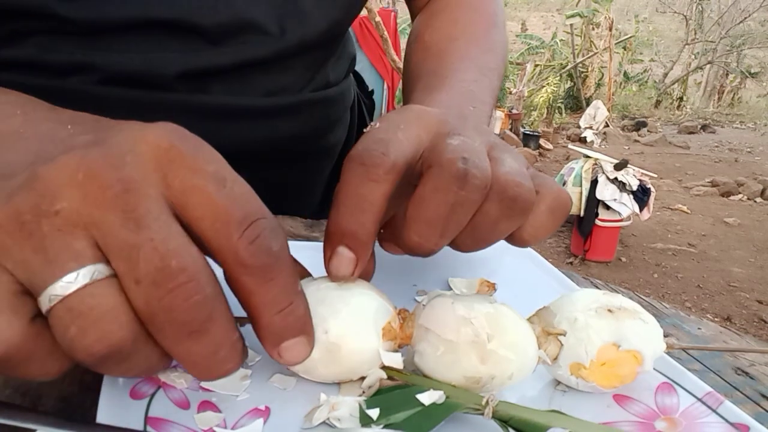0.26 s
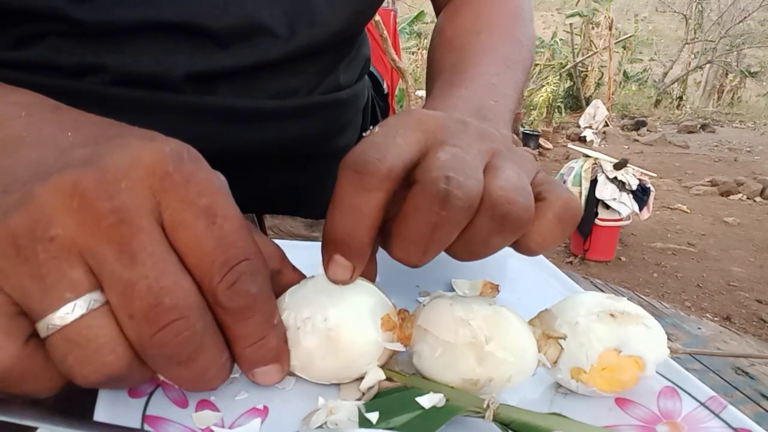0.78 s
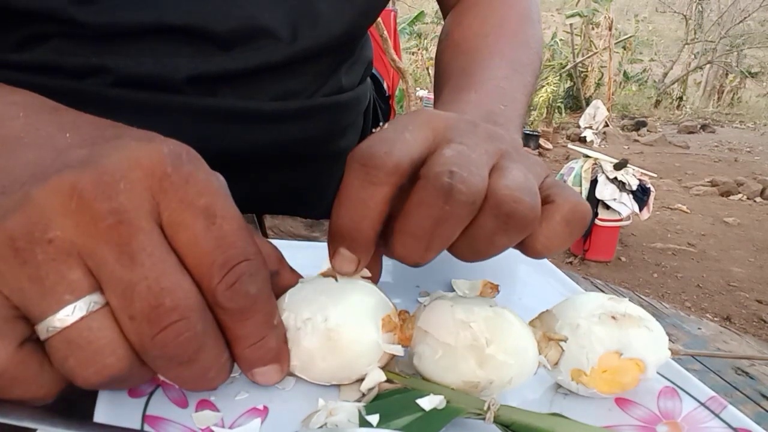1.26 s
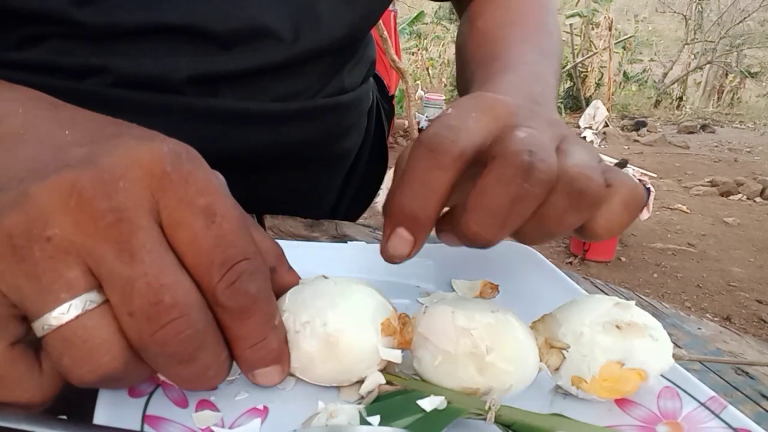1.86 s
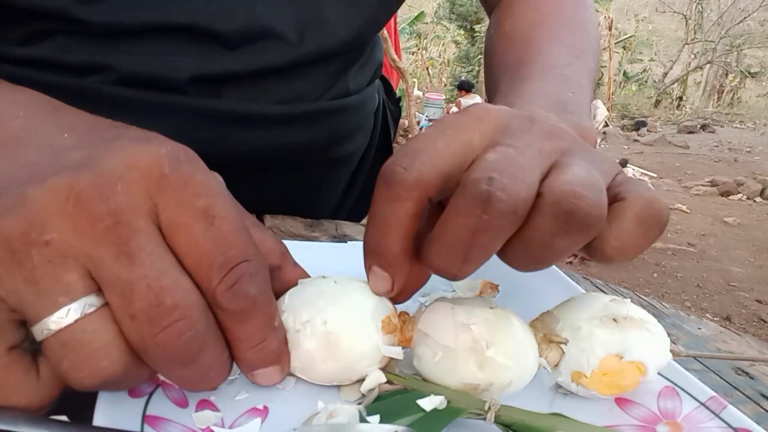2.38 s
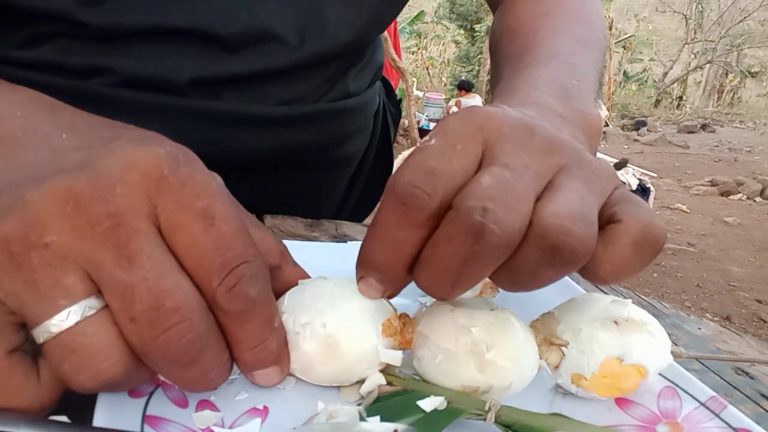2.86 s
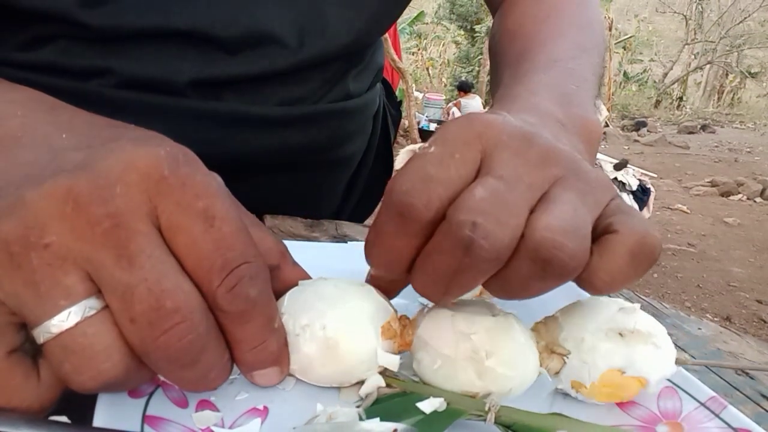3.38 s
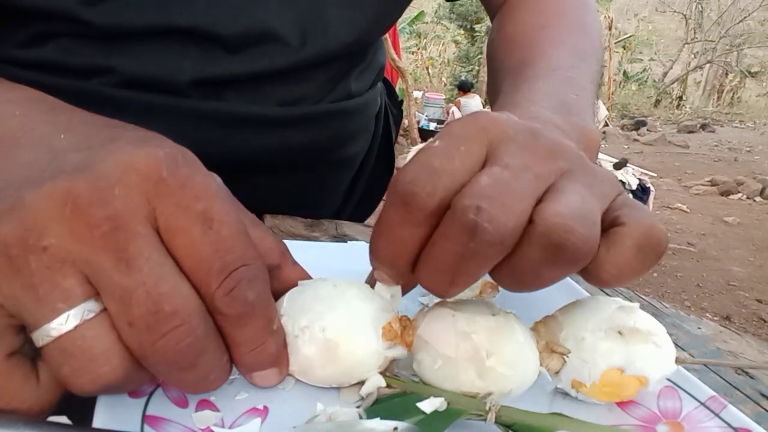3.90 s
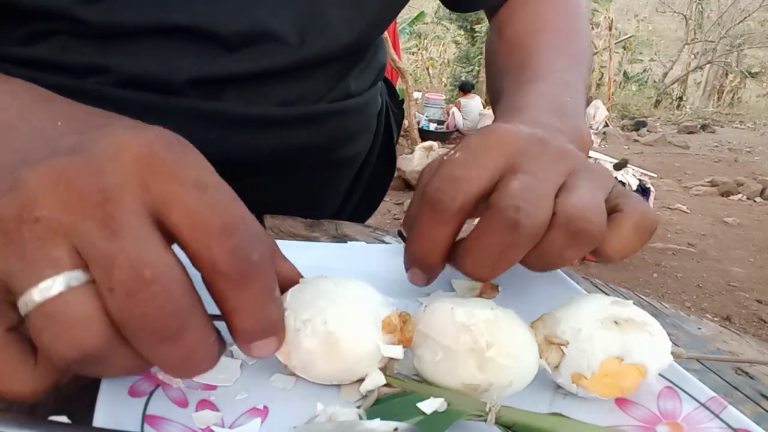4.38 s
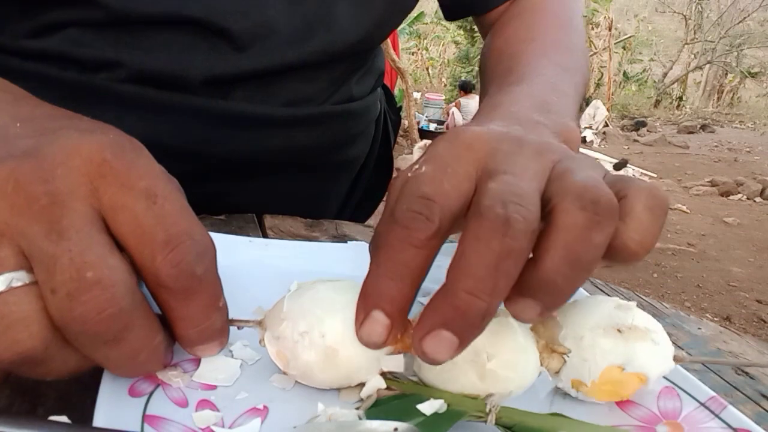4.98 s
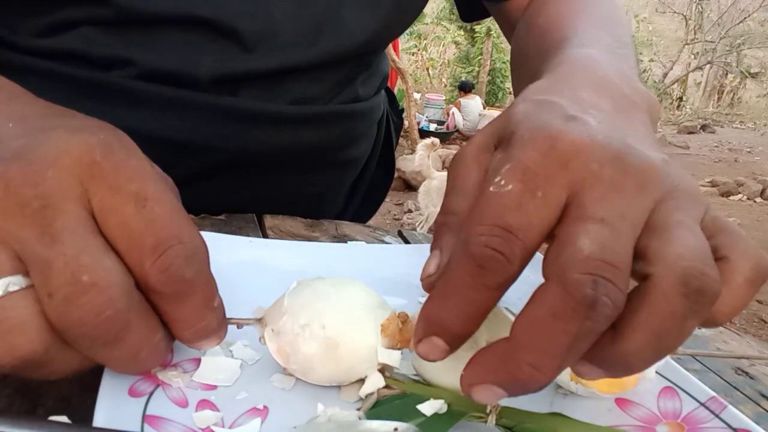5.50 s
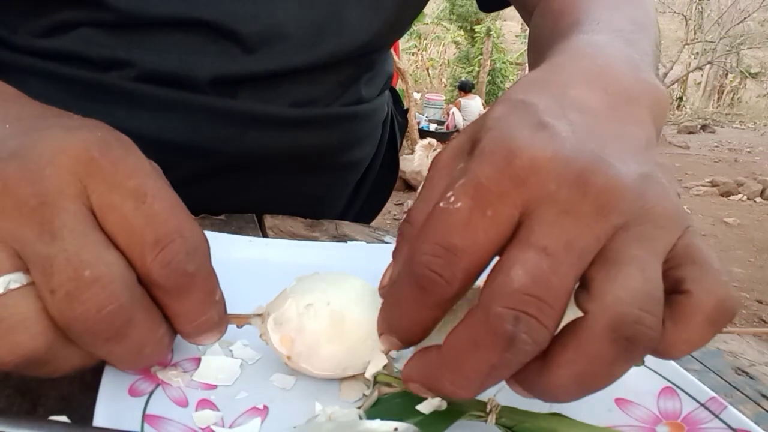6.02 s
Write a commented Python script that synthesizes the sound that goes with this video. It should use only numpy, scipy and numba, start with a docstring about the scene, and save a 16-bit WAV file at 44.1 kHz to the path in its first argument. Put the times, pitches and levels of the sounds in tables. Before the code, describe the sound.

Close-miked eggshell peeling: light ticks, crackling membrane and a few hard snaps. A faint distant crow trails off first; a second later a near rooster crows loudly, hoarse and torn, with clear sung notes between rasps, ending in a falling moan. Then mostly picking sounds, short tray scrapes and pauses, over a low hush of open air and small wind thumps.

```python
"""Rooster and boiled eggs in a dirt yard

A distant rooster trails off as two wavering partials, then one crows close by: sung notes are stacks of
partials, the rasp is chaotic puffs and breath ringing the windpipe. At the microphone fingers pick shell
off boiled eggs on a plastic tray: noise-burst snaps, clicks as crackle, two drags ringing the tray modes.
A light wind buffets the microphone over the hush of the yard, both of them coloured noise."""
import sys
import numpy as np
from scipy import signal
from scipy.fft import rfft, irfft
from scipy.io import wavfile
from scipy.ndimage import uniform_filter1d
from numba import njit

SR = 44100
rng = np.random.default_rng(int(sys.argv[2]) if len(sys.argv) > 2 else 0)


def log_audio(samples):
    """Write samples as a 16-bit WAV file to the path given in sys.argv[1]."""
    # one column per channel
    frames = np.atleast_2d(samples).T
    # limit to full scale, then quantise
    limited = np.clip(frames, -1, 1)
    pcm = np.round(limited * 32767).astype(np.int16)
    wavfile.write(sys.argv[1], SR, pcm)


N = 275625
TIME = np.arange(N) / SR

# The near rooster's neck sinks and the windpipe lengthens. Each row: time in seconds, share sunk from 0 to 1.
SINK = [(1.35, 0), (2.05, 0), (2.2, .35), (2.36, .88), (2.6, 1)]


def from_db(db):
    """Decibels to gain."""
    return 10 ** (np.asarray(db) / 20)


def rms_one(x):
    """Scale to rms 1."""
    return x / np.sqrt(np.mean(x ** 2) + 1e-20)


def evened(x):
    """Hold the slow level at 1."""
    return x / np.sqrt(uniform_filter1d(x ** 2, size=6000) + 1e-20)


def in_time(rows):
    """Columns of a curve table, read at every sample."""
    s, *columns = np.transpose(rows)
    return [np.interp(TIME, s, c) for c in columns]


def at_hz(points, hz):
    """Read a spectrum on a log-frequency axis."""
    points = np.array(points)
    return np.interp(np.log(hz), np.log(points[:, 0]), points[:, 1])


def span(start_s, end_s, fade_s):
    """1 between two moments, else 0; each ramp is centred on its moment and reaches fade_s either side."""
    rising, falling = TIME - start_s + fade_s, end_s + fade_s - TIME
    return np.clip(np.minimum(rising, falling) / fade_s / 2, 0, 1)


def sounding(rows, fade_s):
    """1 while a table lasts."""
    return span(rows[0][0], rows[-1][0], fade_s)


def swells(rows):
    """Bell-shaped rises of level."""
    return sum(from_db(db) * np.exp(-((TIME - s) / half_s) ** 2) for s, db, half_s in rows)


def drift(rate):
    """Random wandering of spread 1: noise through two equal low-passes at a rate in Hz."""
    r = np.exp(-2 * np.pi * rate / SR)
    wander = signal.lfilter([1], [1, -2 * r, r * r], rng.standard_normal(N + SR))
    return rms_one(wander[SR:])      # the first second lets the filter settle


def turning(hz, waver, rate):
    """Phase of an oscillator whose pitch wavers by a share of itself."""
    return 2 * np.pi * np.cumsum(hz * (1 + waver * drift(rate))) / SR


def coloured(spectrum):
    """Noise of a given spectrum, rms 1."""
    hz = np.fft.rfftfreq(N, 1 / SR) + 1
    return rms_one(irfft(rfft(rng.standard_normal(N)) * from_db(at_hz(spectrum, hz)), N))


@njit
def resonate(x, angle, r):
    """A two-pole resonance whose centre can move; gain 1 on top."""
    y = np.zeros(len(x))
    for i in range(2, len(x)):
        y[i] = (1 - r * r) / 2 * (x[i] - x[i - 2]) + 2 * r * np.cos(angle[i]) * y[i - 1] - r * r * y[i - 2]
    return y


def mode(x, hz, width_hz):
    """One resonance, fixed or moving."""
    angle = 2 * np.pi * hz / SR + 0 * x      # 0 * x spreads a fixed centre over all samples
    return resonate(x + 1e-18, angle, np.exp(-np.pi * width_hz / SR))


def grains(per_s, spread_db):
    """Random clicks of uneven size, coming in clumps."""
    born = rng.random(N) < per_s * from_db(5 * drift(25)) / SR
    size = from_db(spread_db * np.minimum(rng.exponential(1, N), 4))
    return born * size * rng.choice([-1, 1], N)


def yard_echo(x, t60, cut_hz):
    """Scattered, dull returns from trees and huts: a dying noise tail after a 12 ms gap."""
    age = np.arange(SR // 2) / SR
    tail = rng.standard_normal(len(age)) * from_db(-60 * age / t60) * (age > .012)
    tail = signal.sosfilt(signal.butter(2, cut_hz, fs=SR, output="sos"), tail)
    return signal.fftconvolve(x, tail / np.sqrt(np.sum(tail ** 2)))[:N]


def yard():
    """The hush of the place: steady coloured noise that swells slightly."""
    # Each row: frequency in Hz, relative level in dB per Hz.
    hush_colour = [(35, -44), (60, -28.5), (113, 2), (200, -2.5), (450, -7.5), (900, -14.5), (1400, -15.5),
                   (2800, -19), (6800, -20), (10500, -26.5), (12000, -40), (15300, -33), (16000, -55.5)]
    level_db, swell_db = -55.5, 1.0
    return from_db(level_db + swell_db * drift(2.7)) * coloured(hush_colour)


def wind():
    """Air buffeting the microphone: low noise in gusts over a restless breeze."""
    # Each row: frequency in Hz, relative level in dB per Hz.
    wind_colour = [(12, -47), (20, -20.5), (53, 3), (97, 4), (128, 2), (220, -17.5), (258, -26), (296, -32),
                   (500, -14), (650, -64), (1100, -120)]
    # Gusts. Each row: middle in seconds, peak level in dB, seconds from the middle to 1/e of the peak.
    gust_rows = [(.215, -41.5, 0.013), (1.36, -60, 0.016), (1.78, -48.5, 0.018), (2.2, -50, 0.026),
                 (2.28, -51.5, .02), (2.48, -43.5, 0.093), (2.62, -42.5, 0.065), (2.83, -45.5, .04),
                 (2.98, -42, 0.053), (3.2, -59, .15), (4.7, -61, .06), (4.93, -49, 0.036),
                 (5.01, -57, 0.021)]
    breeze_db, swing_db = -66, 3.5
    blowing = from_db(breeze_db + swing_db * drift(3.5)) + swells(gust_rows)
    return blowing * from_db(1.7 * drift(13.7)) * coloured(wind_colour)


def far_rooster():
    """Distance leaves two slightly wavering partials and their echo."""
    # Each row: time in seconds, 2nd partial in Hz, its level in dB, 1st partial level in dB.
    far_rows = [(0, 1850, -53, -70), (.05, 1835, -59, -70), (.09, 1815, -55, -70), (.2, 1775, -53.5, -67),
                (.3, 1715, -53.5, -71), (.4, 1640, -55, -64), (.44, 1610, -57, -68), (.46, 1595, -66, -74)]
    hoarseness, clears_s = 0.91, 0.27      # share at the start, seconds to fall to 1/e
    hz, second_db, first_db = in_time(far_rows)
    phase = turning(hz / 2, .005, 60)
    second = from_db(second_db + 1.1 * drift(54)) * np.sin(2 * phase)
    first = from_db(first_db + 2 * drift(15)) * np.sin(phase)
    roughness = 1 + hoarseness * np.exp(-TIME / clears_s) * drift(330)
    voice = np.sqrt(2) * (second + first) * roughness * sounding(far_rows, .02)
    return voice + from_db(-11) * yard_echo(voice, t60=0.4, cut_hz=4600)


def crackle():
    """Membrane and crumbs: tiny clicks dealt to short bright rings, in bursts over a steady trickle."""
    # Bursts. Each row: middle in seconds, peak level in dB, seconds from the middle to 1/e of the peak.
    burst_rows = [(.4, -68, 0.39), (.98, -58, 0.057), (1.25, -57, 0.07), (2.96, -60, .03),
                  (3.13, -54, 0.017), (3.29, -56, 0.032), (3.55, -67, .12), (3.675, -43.5, 0.018),
                  (3.93, -46, .02), (4.17, -51, 0.033), (4.4, -62.5, 0.02), (4.9, -67, .08),
                  (5.63, -67, 0.026)]
    trickle_db = -71
    clicks, dealt = grains(900, 1.4), rng.integers(0, 10, N)
    rings = 0
    for k, hz in enumerate(np.geomspace(2500, 12000, num=10)):
        rings = rings + mode(clicks * (dealt == k), hz, 0.75 * hz)
    return (from_db(trickle_db) + swells(burst_rows)) * rms_one(rings)


def snaps():
    """Each break is a burst of dying noise around its own centre, broad underneath, and knocks the egg."""
    # Each row: start in seconds, crack peak in dB, centre in Hz, burst t60 in seconds (3 ms at least),
    # peak of the dull knock in dB over the crack.
    snap_rows = [(0.191, -42, 3400, 0.19, -29), (0.334, -39.5, 4140, 0.15, -7),
                 (0.43, -36, 4440, 0.015, -22), (0.4407, -39, 4600, 0.061, -31),
                 (0.4643, -35, 4500, 0.042, -8), (0.49, -30, 6000, 0.0083, -11),
                 (0.5022, -35.5, 4550, 0.017, -12), (0.599, -32, 5070, 0.015, -15),
                 (0.7113, -31.5, 5360, 0.011, -15), (0.7183, -33.5, 5340, 0.012, -30),
                 (0.8568, -44, 6550, 0.02, -20), (0.9465, -24, 9600, 0.0074, -21),
                 (0.9602, -22, 6060, 0.026, -27), (0.995, -32, 8520, 0.0099, -34),
                 (0.9997, -33.5, 8600, 0.025, -17), (1.0162, -22.5, 6700, 0.0086, -20),
                 (1.1114, -42.5, 3470, 0.059, -14), (1.226, -25.5, 4230, 0.017, -16),
                 (1.2761, -18.5, 3070, 0.034, -26), (1.3, -36, 4300, 0.11, -11),
                 (1.3178, -37.5, 2580, 0.032, -23), (1.501, -3.5, 8540, 0.019, -53),
                 (1.5152, -10, 3930, 0.046, -32), (1.5693, -7.5, 4700, 0.0082, -44),
                 (1.5844, -15.5, 4690, 0.0065, -35), (1.6025, -20, 4500, 0.032, -23),
                 (2.935, -12.5, 5860, 0.01, -16), (2.9446, -13.5, 5630, 0.015, -35),
                 (3.106, -19.5, 5070, 0.0087, -49), (3.1207, -17, 4950, 0.026, -17.5),
                 (3.1377, -41, 2810, 0.041, -11), (3.177, -39, 2730, 0.037, -9),
                 (3.2916, -34, 5160, 0.07, -11), (3.4253, -39, 5560, 0.024, -18),
                 (3.478, -16, 4230, 0.014, -31), (3.5775, -23, 5300, 0.0092, -6.5),
                 (3.6, -35, 5770, 0.024, -25), (3.662, -14.5, 3030, 0.0081, -22.5),
                 (3.6706, -25, 7700, 0.025, -10.5), (3.6793, -19.5, 7400, 0.013, -23),
                 (3.7233, -39.5, 2870, 0.02, -20), (3.7776, -22.5, 8240, 0.0086, -44),
                 (3.8494, -34, 5760, 0.014, -19), (3.902, -22.5, 10800, 0.0037, -28),
                 (3.9178, -30, 4400, 0.017, -17), (3.94, -36, 8540, 0.06, -18),
                 (4.143, -13, 4700, 0.02, -42), (4.151, -2, 5200, 0.026, -37),
                 (4.2087, -26, 8700, 0.033, -41), (4.232, -36.5, 5020, 0.028, -25),
                 (4.6774, -27.5, 2950, 0.0078, -30), (4.732, -53, 4290, 0.026, -4),
                 (4.7568, -18.5, 6000, 0.0096, -23), (4.775, -38, 7070, 0.022, -12),
                 (4.809, -43.5, 2770, 0.02, -2.5), (4.9147, -38, 5670, 0.015, -29),
                 (4.927, -36, 3900, 0.019, -34), (5.021, -39, 2770, 0.022, -14.5),
                 (5.622, -34, 7900, 0.0085, -27), (5.637, -36, 4960, 0.014, -32),
                 (5.9105, -48, 3700, 0.028, -15), (6.2081, -16, 8440, 0.013, -25.5)]
    out, age = np.zeros(N + 4000), np.arange(4000) / SR
    noises = rng.standard_normal((len(snap_rows), 4000))
    broad_band = signal.butter(2, [1900, 13000], "band", fs=SR, output="sos")
    attack = np.minimum(age / .0001, 1) * (1 + 0.5 * np.exp(-age / 0.00077))
    for (s, peak_db, hz, t60, knock_db), noise in zip(snap_rows, noises):
        burst = noise * from_db(-60 * age / max(t60, .003)) * attack
        crack = mode(burst, hz, 0.17 * hz) + 0.21 * signal.sosfilt(broad_band, burst)
        knock = mode(mode(burst, 700, 800), 800, 750)
        snap = crack / abs(crack).max() + from_db(knock_db) * knock / abs(knock).max()
        at = int(s * SR)
        out[at:at + 4000] += from_db(peak_db) * snap
    return out[:N]


def windpipe(source, modes):
    """Parallel modes that slide as the neck sinks; each is passed twice so the valleys stay dark."""
    sink, = in_time(SINK)
    out, flutter = 0, drift(37)
    for k, (up_hz, down_hz, width_hz, up_db, down_db) in enumerate(modes):
        hz = up_hz + sink * (down_hz - up_hz)
        twice = evened(mode(mode(source, hz, width_hz), hz, 3.0 * width_hz))
        caught_db = 3.37 * np.roll(flutter, k * SR // 3)      # the chaotic source catches each mode in fits
        level_db = up_db + sink * (down_db - up_db) + caught_db
        out = out + (-1) ** k * from_db(level_db) * twice
    return evened(out)


def lower_side():
    """Phase of the lower side of the voice box, and its level where it leaves the song for a hoarse tone."""
    # Each row: start in seconds, end in seconds, start in Hz, end in Hz, level in dB before throb and flutter.
    hoarse_rows = [(1.361, 1.455, 1130, 1135, -30.5), (1.572, 1.605, 1110, 990, -27),
                   (1.745, 1.808, 970, 1070, -30.5), (2.27, 2.425, 1110, 1062, -31.5)]
    rest_hz, glide_s, fade_s = 860, .03, 0.0051
    hz, hoarse = rest_hz, 0
    for start_s, end_s, start_hz, end_hz, db in hoarse_rows:
        glide_hz = np.interp(TIME, [start_s, end_s], [start_hz, end_hz])
        hz = hz + span(start_s - glide_s, end_s + glide_s, glide_s) * (glide_hz - rest_hz)
        hoarse = hoarse + from_db(db) * span(start_s, end_s, fade_s)
    return turning(hz, 0.02514, 60.9), hoarse


def throbs():
    """Fresh pushes of air, once a catch, each with a quick rise and a slower fall, in dB."""
    # Each row: start in seconds, peak in dB over the lull before each layer takes its share.
    throb_rows = [(1.807, 1.5), (1.838, 3.5), (1.879, 7), (1.915, 4), (1.953, 10.5), (1.987, 8.5),
                  (2.02, 6.5), (2.036, -10.5), (2.048, 13), (2.092, 8.5), (2.124, 6.5), (2.168, 9.5),
                  (2.2, 7.5), (2.255, -0.5), (2.299, 4), (2.33, 4), (2.372, 2.5), (2.392, 2.5), (2.435, -1)]
    push_db = np.zeros(N)
    for s, db in throb_rows:
        age = np.maximum(TIME - s, 0) / 0.0061
        push_db += db * age * np.exp(1 - age)
    return push_db


def upper_whistle(upper, push_db):
    """The upper side sounds as a hoarse whistle in spans."""
    # Each row: start in seconds, end in seconds, dB over the rasp's level curve before throb and flutter.
    whistle_rows = [(1.415, 1.485, -0.5), (1.834, 1.866, -12), (1.92, 2.174, -9), (2.181, 2.446, 2)]
    level = sum(from_db(db) * span(start_s, end_s, .008) for start_s, end_s, db in whistle_rows)
    return level * from_db(0.72 * push_db + 3.0 * drift(57)) * np.sqrt(2) * np.sin(upper)


def rasp():
    """The two sides choke each other's air: puffs of sum and difference tones, with breath, ring the windpipe."""
    # One table for each of three raspy stretches, then one for the noisy break-up of the last sung note.
    # Each row: time in seconds, level in dB, treble in dB, before throbs and layer trims.
    rasp_tables = [
        [(1.355, -44.5, -52), (1.365, -27.5, -33), (1.41, -20.5, -24.5), (1.44, -24, -22), (1.49, -41.5, -41)],
        [(1.555, -38.5, -47.5), (1.59, -22.5, -27), (1.64, -21.5, -18.5), (1.7, -42.5, -45),
         (1.72, -20.5, -19.5), (1.75, -21, -25.5), (1.785, -36.5, -38), (1.81, -25.5, -38.5)],
        [(1.81, -18, -30), (1.94, -18, -24.5), (1.984, -26, -32), (2.0, -20.5, -26), (2.2, -22, -31),
         (2.35, -27.5, -30), (2.44, -24, -23), (2.46, -27, -25.5), (2.59, -34.5, -31), (2.66, -57, -48)],
        [(2.88, -51, -64), (2.9, -44, -41), (2.94, -54, -44)],
    ]
    # Pitch of the upper side. Each row: time in seconds, pitch in Hz before the waver.
    upper_pitch = [(1.4, 1457), (1.82, 1423), (1.86, 1450), (1.92, 1538), (2.03, 1511), (2.06, 1436),
                   (2.19, 1500), (2.235, 1415), (2.45, 1367)]
    # Windpipe modes. Each row: Hz neck up, Hz neck down, width in Hz of the first pass,
    # relative dB neck up, relative dB neck down.
    low_modes = [(700, 643, 54, -5.5, -6.5), (947, 860, 280, 0, -9), (1090, 1060, 310, 2.5, -3)]
    main_modes = [(1512, 1321, 68, 8, -1), (1722, 1475, 71, -3, -7.5)]
    high_modes = [(2500, 2345, 230, -4.5, -3), (3560, 3260, 110, 0.5, 0.2), (3590, 3860, 370, -6, -5.5),
                  (4690, 3800, 100, -5, -14.5), (5300, 5000, 210, -36.5, -10.5),
                  (6235, 5970, 160, -9, -5.5), (7070, 6640, 360, -14, -24.5), (7600, 7540, 260, -24.5, -19),
                  (8370, 8470, 470, -15.5, -16.5), (9230, 9600, 690, -12, -19.5),
                  (10610, 3400, 620, -31.5, -24), (12800, 11000, 710, -26.5, -21),
                  (12950, 9300, 680, -29.5, -43), (14720, 16000, 1210, -38.5, -27.5)]
    # Unshaped rasp between the high modes, one value for each rasp table, in dB over the treble.
    broad_levels = [-4, -12, -15, -2.5]
    lows_up_db, lows_down_db = -1.5, -3.5      # low modes over the main ones, neck up and neck down
    breath_share = .9

    sink, = in_time(SINK)
    lower, hoarse = lower_side()
    upper = turning(in_time(upper_pitch)[0], 0.01499, 62.4)
    pulses = np.exp(7.0 * np.cos(lower) + 2.8 * np.cos(upper))
    puffs = np.diff(pulses, n=2, prepend=[0, 0]) * from_db(1.2 * drift(230))      # differencing sharpens them
    breath = rng.standard_normal(N) * np.exp(1.9 * np.cos(lower))
    source = rms_one(puffs * (TIME > .1)) + breath_share * rms_one(breath)

    push_db = throbs()
    low, main, high = [windpipe(source, modes) for modes in (low_modes, main_modes, high_modes)]
    broad = evened(mode(source, 4200, 2600))
    low_db = lows_up_db + sink * (lows_down_db - lows_up_db)
    lows = from_db(0.56 * push_db - 5) * (main + from_db(low_db) * low)
    whistle = upper_whistle(upper, push_db)
    out = hoarse * from_db(0.28 * push_db + 4.0 * drift(50)) * np.sqrt(2) * np.sin(lower)
    for rows, broad_db in zip(rasp_tables, broad_levels):
        level_db, treble_db = in_time(rows)
        body = from_db(level_db) * (lows + whistle)
        treble = from_db(treble_db + 1.32 * push_db - 6) * (high + from_db(broad_db) * broad)
        out = out + sounding(rows, 0.00544) * (body + treble)
    # the short throat radiates nothing deeper
    return signal.sosfilt(signal.butter(6, 590, "high", fs=SR, output="sos"), out)


def sung(rows, tops, waver, warbles=False):
    """Regular closing of the membranes: a clean stack of partials."""
    warble_hz, low_point_s = 16.6, 1.97
    pitch_share, first_gain_db = .065, 2      # swing either way; the 1st partial gains at the low points
    hz, first_db, second_db, upper_db = in_time(rows)
    dip = warbles * np.cos(2 * np.pi * warble_hz * (TIME - low_point_s))
    hz = hz * (1 - pitch_share * dip)
    first_db = first_db + first_gain_db * dip
    on = sounding(rows, .006) > 0
    phase, flicker = turning(hz, waver, 39.37)[on], drift(19)
    hz = hz[on]
    voice = from_db(first_db[on]) * np.sin(phase) + from_db(second_db[on]) * np.sin(2 * phase + 1)
    for k in range(3, 22):
        flicker_db = 2.5 * np.roll(flicker, k * SR // 4)[on]      # each partial flickers on its own
        top_db = at_hz(tops, k * hz) - 60 * (k * hz > 15500)
        voice += from_db(upper_db[on] + top_db + flicker_db) * np.sin(k * phase + k * k / 3)
    out = np.zeros(N)
    out[on] = np.sqrt(2) * voice
    return out * sounding(rows, 0.0026)


def near_rooster():
    """The close crow: rasp and four sung notes, with their echo from the yard."""
    # One table a note. Each row: time in seconds, pitch in Hz before waver and warble, 1st partial in dB
    # before warble, 2nd partial in dB, upper partials in dB before their spectrum and flicker.
    notes = [
        [(1.61, 873, -25.5, -60, -42), (1.65, 832, -20.5, -30.5, -27.5), (1.69, 860, -18.5, -20, -26),
         (1.715, 861, -20.5, -29, -22), (1.75, 790, -27.5, -44, -48)],
        [(1.82, 885.5, -22.5, -45, -34), (1.9, 880, -20.5, -39, -35), (1.93, 889, -52, -36, -55),
         (1.96, 885, -21, -40, -31), (2.1, 896.4, -24, -37, -30.5), (2.17, 871, -39, -37, -30.5)],
        [(2.44, 852, -32, -44, -44), (2.55, 812.4, -34, -38, -26.5), (2.59, 789, -50, -31.5, -41.5)],
        [(2.585, 760, -35, -32.5, -36), (2.715, 744, -36.5, -27.5, -32), (2.84, 716.8, -30, -23, -36.5),
         (2.875, 700, -27, -16.5, -34), (2.89, 687, -29, -20.5, -47), (2.905, 693.4, -39, -17, -53),
         (2.92, 676, -30, -28, -56), (2.97, 586, -47, -64, -70)],
    ]
    # Upper partials, beak wide open and beak closing. Each row: frequency in Hz, relative level in dB.
    open_tops = [(2500, -11.5), (3000, -23), (3450, -0.5), (4200, -16.5), (5200, -22), (6000, -26.5),
                 (6900, -16.5), (7800, -19.5), (8600, -14.5), (10200, -26), (15500, -65.5)]
    closing_tops = [(2100, -4), (2280, 2.5), (2950, -15), (3700, -29.5), (4400, -32), (5100, -7),
                    (5900, -6.5), (6600, -22), (7400, -23.5), (8200, -14), (9600, -27), (10800, -25.5),
                    (12500, -40), (15500, -34.5)]
    crow = rasp() + sung(notes[0], open_tops, .009)
    crow = crow + sung(notes[1], open_tops, 0.027, warbles=True)
    crow = crow + sung(notes[2], open_tops, 0.0179)
    crow = crow + sung(notes[3], closing_tops, .0015)
    return crow + from_db(-25) * yard_echo(crow, t60=.5, cut_hz=5900)


def drags():
    """Something dragged on the tray: dense slips ring its modes."""
    # One table a drag. Each row: time in seconds, level in dB.
    drag_rows = [
        [(4.66, -82), (4.674, -37), (4.678, -40.5), (4.708, -45), (4.764, -47), (4.86, -61)],
        [(5.9, -83), (5.912, -37.5), (5.94, -56), (5.952, -36), (6.02, -81)],
    ]
    # Tray modes. Each row: frequency in Hz, width in Hz, relative dB in the first drag, in the second.
    tray_modes = [(336, 21, -15, -0.5), (513, 137, 7, 2.5), (745, 38, -3.5, 3.5), (895, 16, -0.5, -6),
                  (1214, 520, -4, 0), (2030, 106, -7, -0.5), (2750, 320, -1, -26), (3700, 260, -7, -4.5),
                  (4950, 74, -3, -25)]
    slips, out = grains(1500, 2.9), 0
    for k, rows in enumerate(drag_rows):
        tray = 0
        for hz, width_hz, *mode_db in tray_modes:
            tray = tray + from_db(mode_db[k]) * mode(slips, hz, width_hz) / np.sqrt(width_hz)
        tray = rms_one(tray) + 0.15 * rms_one(mode(slips, 1500, 2900))
        out = out + evened(tray) * sounding(rows, 0.0035) * from_db(in_time(rows)[0])
    return out


def scene():
    """All sources at one microphone."""
    surroundings = yard() + wind() + far_rooster()
    eggs = crackle() + snaps() + drags()
    return (surroundings + eggs + near_rooster())[None]


def record(dry):
    """The microphone loses the deepest rumble; the top is cut."""
    low_cut_hz, top_cut_hz = 56, 16600
    thinned = signal.sosfilt(signal.butter(2, low_cut_hz, "high", fs=SR, output="sos"), dry)
    return signal.sosfilt(signal.ellip(10, .5, 60, top_cut_hz, fs=SR, output="sos"), thinned)


dry = scene()
out = record(dry)
log_audio(out)
```